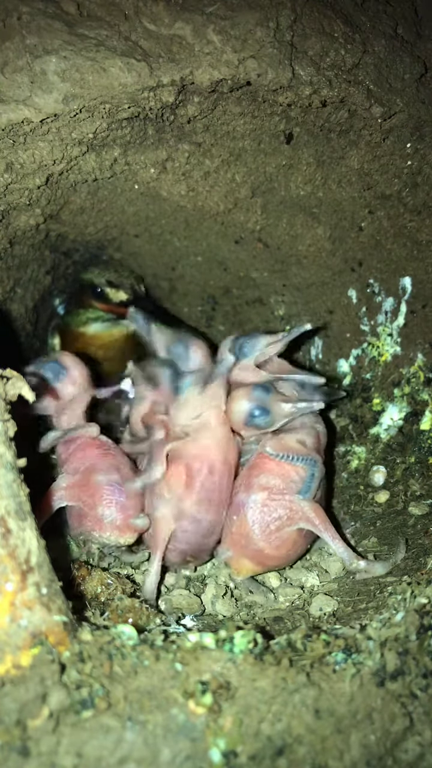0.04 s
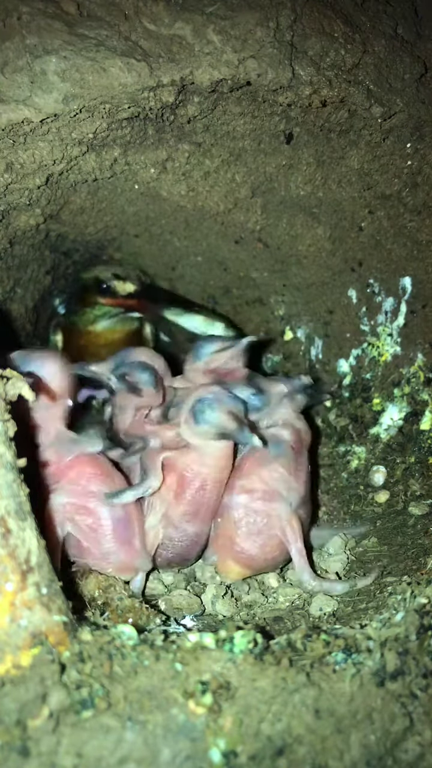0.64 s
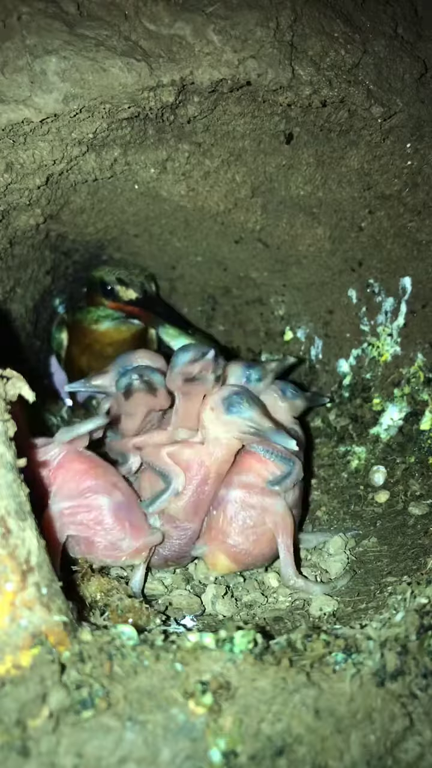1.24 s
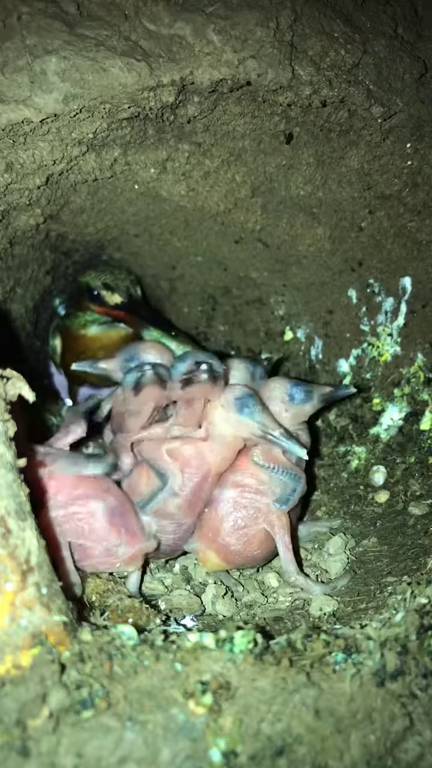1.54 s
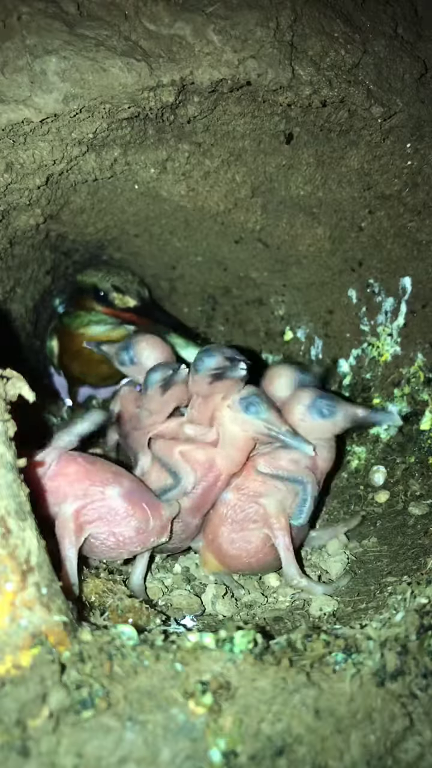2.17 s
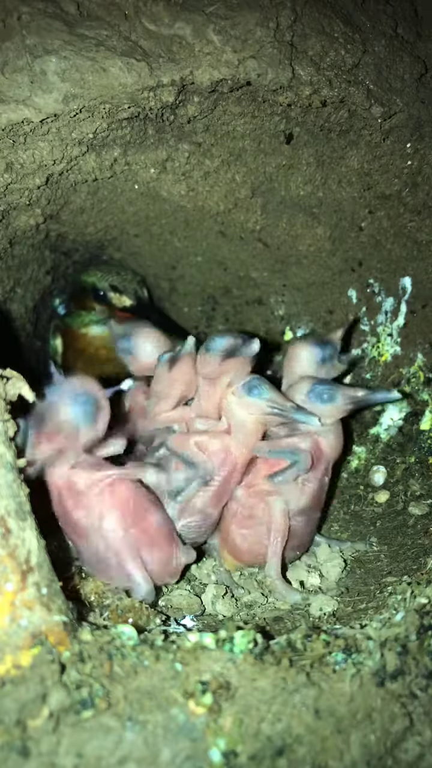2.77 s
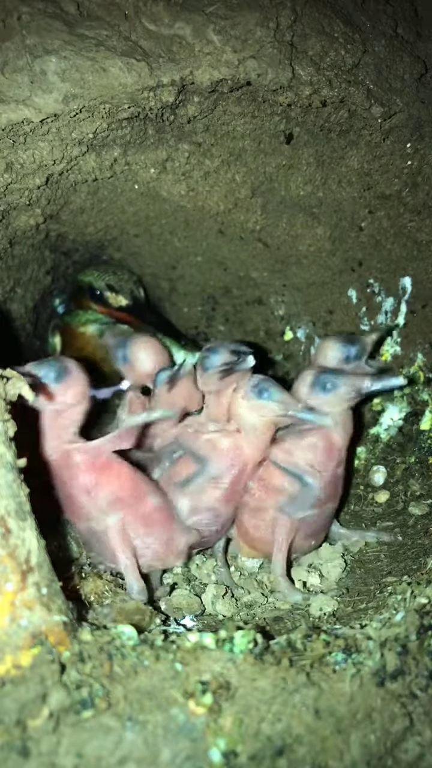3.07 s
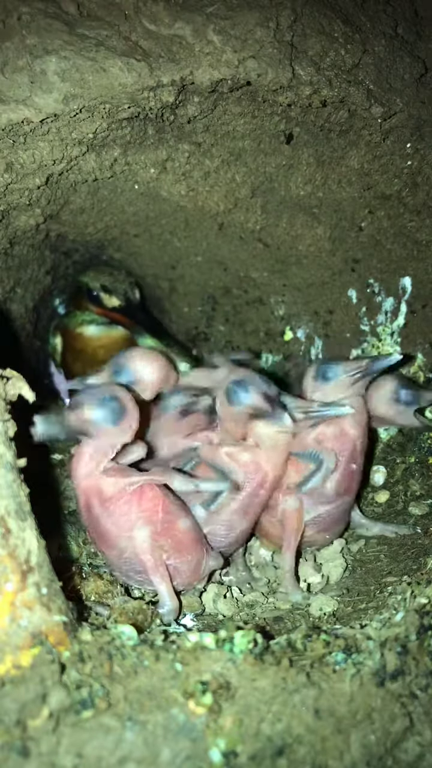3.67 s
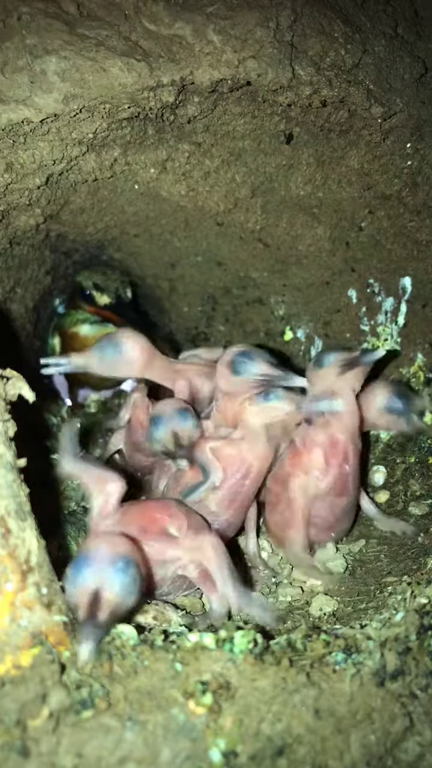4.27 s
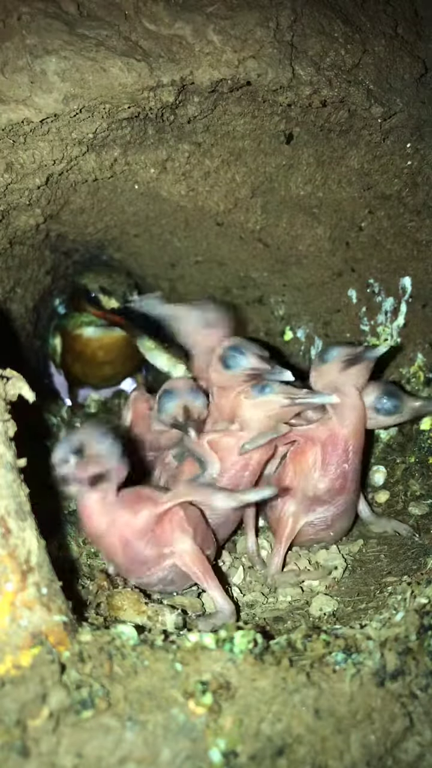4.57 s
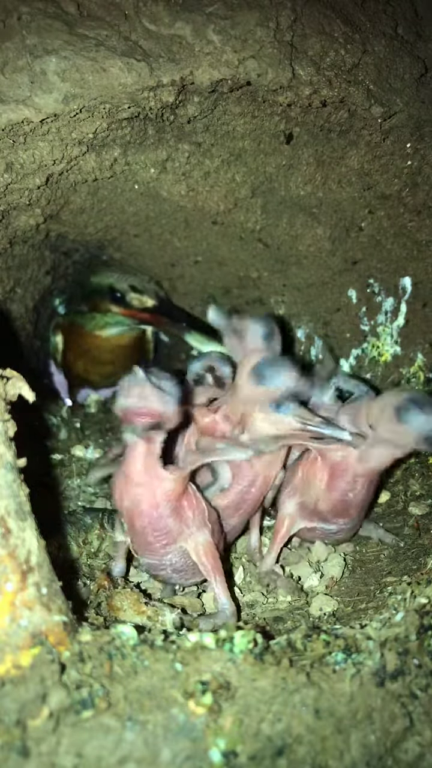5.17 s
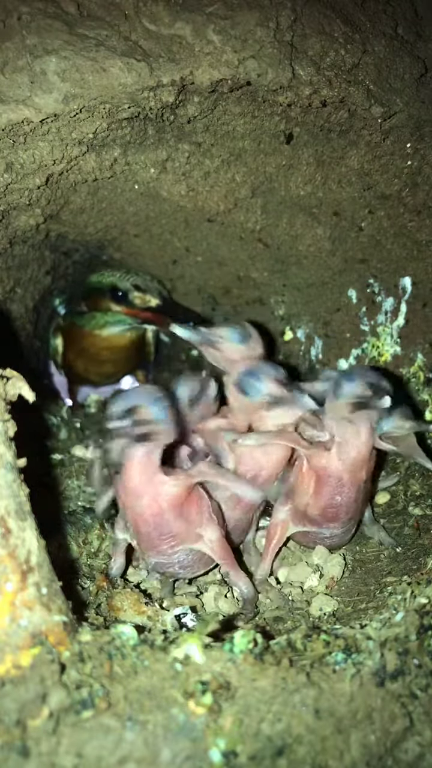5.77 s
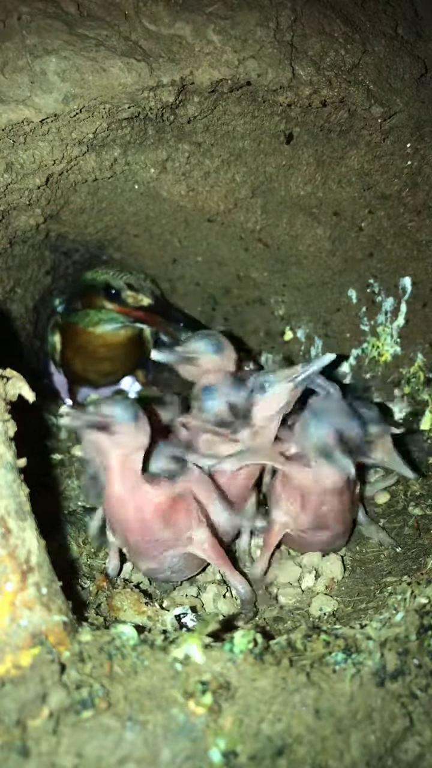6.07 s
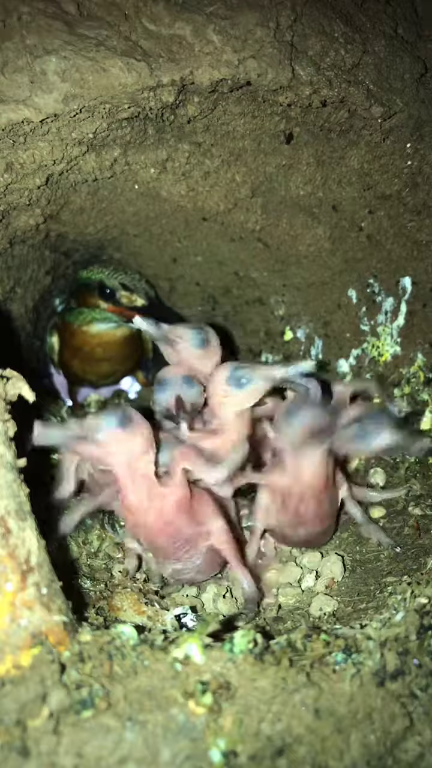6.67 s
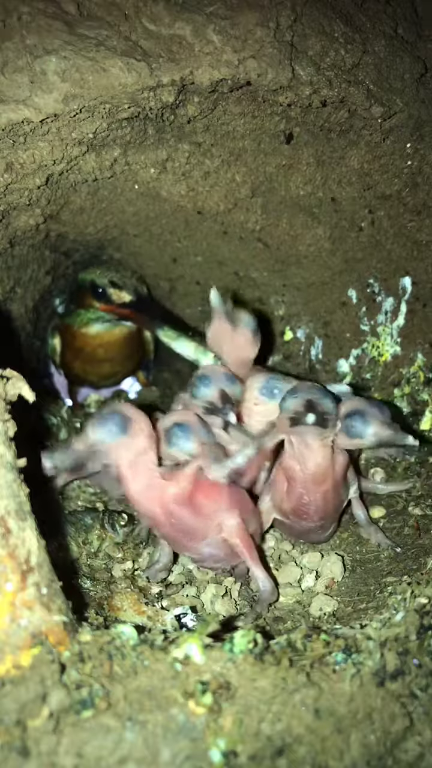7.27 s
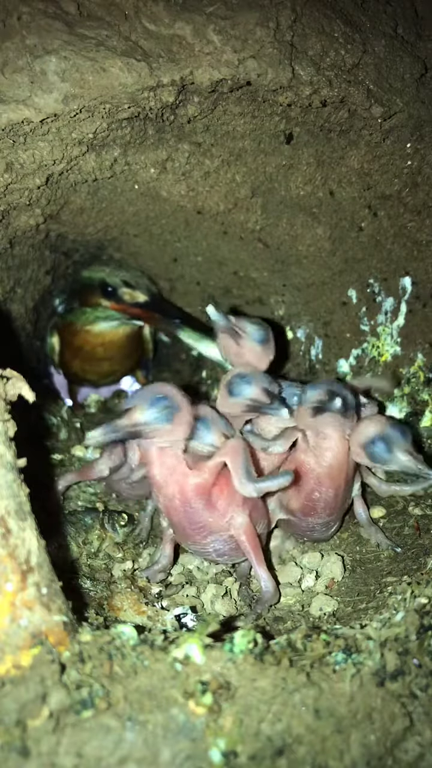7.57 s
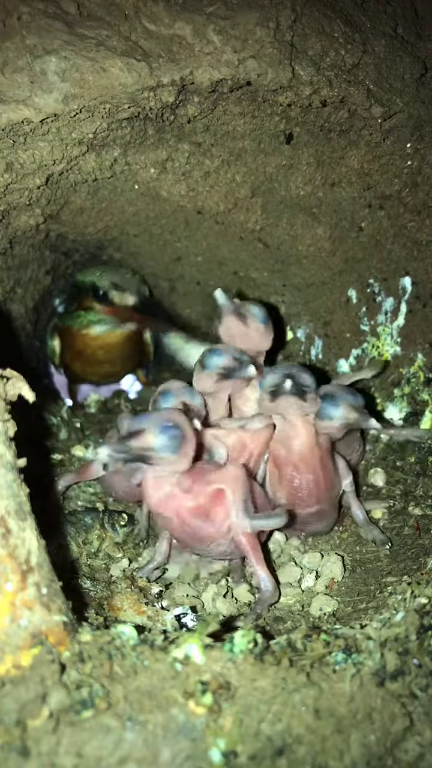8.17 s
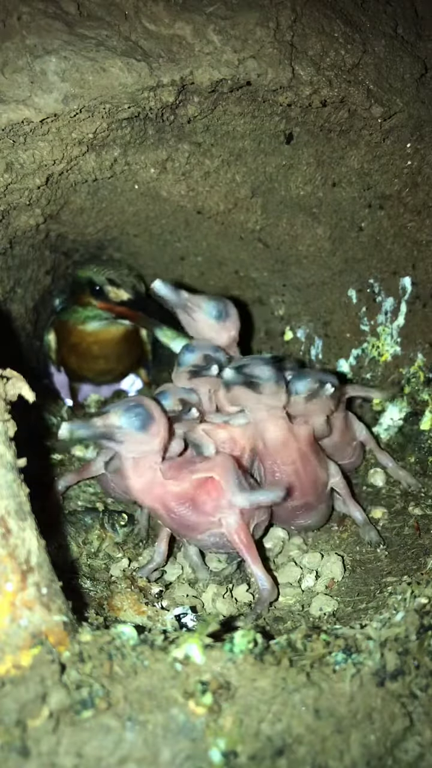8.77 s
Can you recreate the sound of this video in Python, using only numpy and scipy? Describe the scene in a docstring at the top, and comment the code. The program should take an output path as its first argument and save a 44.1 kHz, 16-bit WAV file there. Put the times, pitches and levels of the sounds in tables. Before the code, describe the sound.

Baby birds beg in a dense, high-pitched chorus of raspy cries and thin whistles over a steady low hum.

```python
"""Nestlings begging in an earth burrow

Each call arches in pitch with the push of air through the syrinx: clear at both ends, hoarse at the
top, where the membranes vibrate chaotically. Thin whistles slide between the calls, and the rest of
the brood rasps and calls softly in bouts. Resonances of bills and chamber colour every voice;
a low hum and a faint hiss lie underneath."""
import sys
import numpy as np
from scipy import signal
from scipy.fft import rfft, irfft, next_fast_len
from scipy.io import wavfile
from scipy.ndimage import map_coordinates

SR = 44100
rng = np.random.default_rng(int(sys.argv[2]) if len(sys.argv) > 2 else 0)


def store_pcm(level_fs):
    """Save levels as 16-bit WAV."""
    pcm = np.round(np.clip(level_fs, -1, 1) * 32767).astype(np.int16)
    wavfile.write(sys.argv[1], SR, np.atleast_2d(pcm).T)


N = 398223

# loud calls: t/s, duration/s, nominal top f/Hz, final f/Hz, base level/dB, manner
BEGGING_CALLS = [(0, .038, 6573, 3760, -28, "rasp"), (0.208, 0.099, 7480, 6600, -33, "cry"),
                 (0.26, 0.13, 8040, 4070, -22.5, "wail"), (0.497, 0.092, 7080, 3595, -34, "rasp"),
                 (0.628, 0.083, 9400, 3897, -22.5, "scream"), (0.803, 0.091, 8400, 4060, -25, "scream"),
                 (0.897, 0.12, 7250, 4020, -28.5, "rasp"), (0.982, 0.097, 8860, 7300, -25.5, "squeal"),
                 (1.126, 0.051, 6430, 4500, -31.5, "cry"), (1.242, 0.1, 7450, 3700, -29.5, "rasp"),
                 (1.375, 0.1495, 7170, 5550, -32.5, "rasp"), (1.515, .13, 7210, 4060, -23, "cry"),
                 (1.64, 0.11, 6430, 4200, -26.5, "cry"), (1.807, 0.11, 7800, 5900, -28.5, "rasp"),
                 (1.922, 0.15, 7340, 5000, -24.5, "cry"), (2.097, 0.077, 6170, 4270, -28, "cry"),
                 (2.232, 0.12, 7930, 3380, -21, "wail"), (2.42, 0.11, 7920, 4200, -29.5, "rasp"),
                 (2.484, 0.13, 7680, 5960, -27.5, "wail"), (2.558, 0.099, 8100, 3780, -24.5, "scream"),
                 (2.658, 0.13, 6930, 5900, -27.5, "rasp"), (2.742, 0.17, 7820, 6100, -25, "wail"),
                 (2.905, 0.057, 7930, 4770, -21, "scream"), (3.093, 0.14, 7420, 6560, -21.5, "scream"),
                 (3.242, 0.086, 6950, 3490, -25.5, "scream"), (3.39, 0.19, 7770, 5080, -27, "scream"),
                 (3.509, 0.15, 6960, 5760, -33, "rasp"), (3.658, 0.1, 7690, 3920, -21.5, "scream"),
                 (3.769, .147, 6770, 4430, -32.5, "rasp"), (3.894, 0.064, 7030, 6400, -32.5, "squeal"),
                 (4.003, 0.078, 6830, 3970, -32, "squeal"), (4.078, 0.07, 7870, 3370, -19, "cry"),
                 (4.182, 0.12, 6830, 3860, -29, "squeal"), (4.391, 0.084, 7040, 3870, -30.5, "squeal"),
                 (4.54, 0.049, 8000, 6925, -27.5, "cry"), (4.586, .116, 6870, 4500, -26, "rasp"),
                 (4.717, 0.0981, 7700, 3400, -25, "scream"), (4.852, 0.13, 7550, 7200, -30.5, "cry"),
                 (4.911, 0.07, 6880, 6030, -25.5, "rasp"), (4.944, .12, 7610, 6650, -21.5, "wail"),
                 (5.082, 0.095, 7048, 4780, -22.5, "wail"), (5.236, 0.15, 6440, 4170, -37.5, "squeal"),
                 (5.39, 0.1, 8460, 3690, -18, "scream"), (5.542, 0.053, 6870, 6820, -31, "cry"),
                 (5.623, 0.054, 7030, 6160, -28.5, "squeal"), (5.665, 0.11, 7670, 5730, -21.5, "wail"),
                 (5.785, 0.095, 6450, 3900, -25, "squeal"), (5.838, .129, 7250, 5350, -30, "rasp"),
                 (5.955, 0.15, 6700, 5080, -30.5, "squeal"), (6.162, .102, 7290, 4050, -21.5, "scream"),
                 (6.328, 0.12, 6787, 5160, -29.5, "rasp"), (6.428, 0.086, 7130, 3560, -24.5, "rasp"),
                 (6.483, 0.074, 7850, 3720, -25.5, "scream"), (6.674, 0.12, 7720, 4650, -20, "cry"),
                 (6.834, 0.11, 6740, 3740, -24, "cry"), (6.998, 0.097, 7880, 3500, -19.5, "cry"),
                 (7.146, 0.11, 6900, 4800, -29.5, "cry"), (7.246, .118, 7470, 6400, -24, "cry"),
                 (7.377, 0.088, 7800, 4330, -32, "cry"), (7.495, .11, 7320, 4360, -26, "rasp"),
                 (7.676, 0.13, 7700, 6100, -26.5, "rasp"), (7.775, 0.12, 7230, 5260, -23, "cry"),
                 (7.911, 0.13, 6800, 3720, -27.5, "rasp"), (8.129, 0.11, 7700, 5850, -23.5, "cry"),
                 (8.215, 0.14, 7280, 5730, -28.5, "rasp"), (8.428, 0.096, 7380, 5930, -21.5, "cry"),
                 (8.599, 0.19, 6954, 5400, -26, "rasp"), (8.798, 0.1, 7500, 3530, -20.5, "cry")]
# five manners of calling, as offsets to the base level: manner -> voice/dB, rasp/dB, screech/dB
MANNER_LEVELS = {"cry": (-2.5, -6, -33), "rasp": (-5.5, -3, -13.5), "wail": (-3, -7, -5),
                 "scream": (-4.5, -8, -1.5), "squeal": (-2.5, -15.5, 0)}
# clearest whistles: t/s, duration/s, middle f/Hz, base level/dB, bend
CLEAR_WHISTLES = [(0.06, 0.036, 4540, -34.5, "fall"), (0.468, 0.061, 5330, -31, "fall"),
                  (1.068, 0.046, 4738, -35, "fall"), (2.067, 0.03, 4660, -26.5, "scoop"),
                  (2.309, 0.13, 5840, -33.5, "fall"), (2.816, 0.054, 6236, -31, "fall"),
                  (3.305, 0.051, 5900, -33, "scoop"), (4.138, .129, 6090, -31, "fall"),
                  (4.112, 0.1, 4020, -37.5, "fall"), (5.0, 0.094, 5300, -34, "level"),
                  (5.106, 0.049, 5160, -29, "fall"), (5.165, .091, 5320, -27.5, "level"),
                  (5.895, 0.09, 5210, -31.5, "scoop"), (5.998, 0.059, 5100, -32, "fall"),
                  (6.355, 0.12, 4940, -33, "scoop"), (6.574, 0.15, 6150, -31, "fall"),
                  (6.925, 0.1, 3544, -43, "scoop"), (7.323, 0.14, 4980, -32, "fall"),
                  (7.607, .021, 5660, -30.5, "fall"), (7.8, 0.11, 5460, -35.5, "fall"),
                  (8.038, 0.085, 5990, -32, "fall"), (8.25, .2, 4430, -34.5, "fall"),
                  (8.338, .072, 5850, -30, "fall"), (8.547, 0.0506, 4520, -37, "scoop")]
# pitch contours of a whistle: bend -> first and last frequency as ratios to the middle one
WHISTLE_BENDS = {"fall": (1.03, .86), "scoop": (1.1, 1.07), "level": (1, 1.02)}
# bouts in which the rest of the brood joins in: start t/s, end t/s
BOUTS = [(0, .09), (.23, 1.21), (1.25, 1.735), (1.82, 3), (3.1, 4.505), (4.56, 4.8), (4.86, 6.93),
         (7.005, 7.6), (7.68, 8.09), (8.135, 8.89)]
# spectrum of a hoarse throat at moderate effort: f/Hz, relative level/dB
RASP_SPECTRUM = [(700, -27), (1300, -17.5), (1650, -14), (2300, -14), (2650, -10.5), (3200, -16),
                 (3750, -4), (4400, -6.5), (5400, 0), (7200, 0.5), (8300, -2), (10800, -16.5), (12700, -10),
                 (15800, -14)]
# spectrum of a wide-open bill at full effort: f/Hz, relative level/dB
SCREECH_SPECTRUM = [(600, -31), (1800, -8.5), (2600, 0.5), (3800, -20), (7000, 3), (9300, 11.5),
                    (10800, 6.5), (12500, 9), (15800, 1.5)]
# peaks and one dip in the response of bills and chamber, then a treble cut: f/Hz, width/Hz, gain/dB
CHAMBER_BANDS = [(1880, 249, 3.5), (3570, 710, 4), (4500, 270, 0.5), (5470, 80, 4.5), (6880, 430, 1.5),
                 (8700, 132, -1.5), (15200, 1700, -6.5)]
# spectrum of the background rumble and hiss: f/Hz, relative level/dB
HUM_SPECTRUM = [(20, -41), (30, -17), (42, -5.5), (62, 0.5), (90, -2.5), (122, -0.5), (165, -3), (190, -14),
                (250, -23), (480, -30.5), (1200, -36.5), (4000, -40.5), (10000, -41.5), (15500, -32)]


def begging():
    """Superposition: the calls of the nearest chicks overlap and add."""
    out = np.zeros(N)
    for start, length, top_hz, last_hz, db, manner in BEGGING_CALLS:
        add(out, start, call(length, top_hz, last_hz, db, manner))
    return out


def call(length, top_hz, last_hz, db, manner, rise_s=.0125, fall_s=.019, jitter_hz=420, waver_hz=220,
         twin_ratio=.79, bill_hz=12600, skirt_hz=330, squeal_hz=380):
    """Nonlinear oscillation: pitch follows the push of air, and a hard push makes membranes chaotic."""
    voice_db, rasp_db, screech_db = db + np.array(MANNER_LEVELS[manner])
    u = progress(0, length)
    size, since, left = len(u), u * length, (1 - u) * length
    fall_stretch, chirp_gain = amp(2.5 * rng.standard_normal(2))
    attack = np.exp(-since / rise_s)
    release = np.exp(-left / (fall_s * fall_stretch))
    push = np.abs(np.sin(np.pi * u ** 0.74))  # peaks early in the call
    arch = top_hz * (1 - .22 * attack) + (last_hz - top_hz) * release

    def chaos():
        """Random frequency modulation in Hz, growing with the push."""
        deviation = jitter_hz * wobble(2600, size) + waver_hz * wobble(160.5, size)
        return push * (1 - release) ** 2 * deviation

    shimmer = lambda: flutter(depth_db=5.5, rate=550, size=size)
    level = amp(voice_db + 1) * (0.61 + 0.69 * push ** 2) * (1 - 0.13 * attack) * (1 - .5 * release)
    # a call that dives deep ends in a clear chirp
    dive = np.clip((top_hz - last_hz) / 3000, 0, 1)
    chirp = amp(-20 + 0.32 * db) * chirp_gain * dive * np.sin(np.pi * release ** 1.7)
    voice = np.hypot(level, chirp) * shimmer() * syrinx(arch + chaos(), second_db=-21, third_db=-8)
    # the other side of the syrinx joins in, lower, at full push
    twin = level * amp(-7) * push * shimmer() * tone(twin_ratio * arch + chaos())
    rasp = amp(rasp_db - 1) * (0.44 + 0.67 * push) * (1 - attack ** 2) * (1 - 0.38 * release)
    rasp *= rough_air(size, RASP_SPECTRUM, flutter_hz=693, flutter_db=2.5, ripple_db=3.5, ripple_hz=406.4)
    # the bill gapes with the push and lets out the octave and a bright screech
    gape = amp(screech_db) * push ** 1.1
    bill_gain = amp(-1 - np.abs(2 * arch - bill_hz) / skirt_hz)
    octave = bill_gain * shimmer() * tone(2 * arch + chaos() + squeal_hz * wobble(2200, size))
    screech = amp(-4) * rough_air(size, SCREECH_SPECTRUM, flutter_hz=906, flutter_db=3)
    strain = amp(1.8 * push * wobble(70, size))  # the push itself is unsteady
    gate = np.clip(np.minimum(since, left) / 0.00067, 0, 1)
    return gate * strain * (voice + twin + rasp + gape * (octave + screech))


def syrinx(pitch, second_db, third_db, bill_hz=12500, skirt_hz=230):
    """Resonance: two weak harmonics of a nearly pure tone emerge as they glide through the bill's peak."""
    overtone = lambda hz, db: amp(db - np.abs(hz - bill_hz) / skirt_hz) * tone(hz)
    return tone(pitch) + overtone(2 * pitch, second_db) + overtone(3 * pitch, third_db)


def rough_air(size, spectrum, flutter_hz, flutter_db, ripple_db=0, ripple_hz=830):
    """Source and filter: flapping membranes chop air into puffs, which throat resonances colour."""
    puffs = rng.standard_normal(size) * flutter(flutter_db, flutter_hz, size)
    fft_size = next_fast_len(size + 256)
    f = np.fft.rfftfreq(fft_size, 1 / SR)
    ripple = map_coordinates(rng.standard_normal(128), [f / ripple_hz], mode="mirror")  # each throat's own
    colour_db = spectrum_db(spectrum, f) + ripple_db * ripple
    return unit(irfft(rfft(puffs, fft_size) * amp(colour_db), fft_size)[:size])


def whistles():
    """Superposition: the clearest whistles add up to thin glides among the calls."""
    out = np.zeros(N)
    for start, length, middle_hz, db, bend in CLEAR_WHISTLES:
        add(out, start, whistle(length, middle_hz, db, bend))
    return out


def whistle(length, middle_hz, db, bend, waver_hz=55, drift_hz=70, shimmer_db=3.5):
    """Nearly periodic oscillation: a gentle call stays tonal and quavers along a parabolic bend."""
    u = progress(0, length)
    first, last = WHISTLE_BENDS[bend]
    glide = middle_hz * np.polyval(np.polyfit([0, .5, 1], [first, 1, last], 2), u)
    pitch = glide + waver_hz * wobble(403, len(u)) + drift_hz * wobble(24.8, len(u))
    level = amp(db + 1.5 + shimmer_db * wobble(133.8, len(u))) * fade(u, edge=0.13)
    return level * syrinx(pitch, second_db=-18, third_db=-21)


def soft_calls(length=.105, top_hz=6900, last_hz=4700, spread=.16, base_db=-34, scatter_db=4):
    """Attenuation with distance: chicks further back fill the bouts with weaker calls."""
    out = np.zeros(N)
    for start, top, last, strength in turns(per_second=6, length=length):
        db = base_db + scatter_db * strength
        add(out, start, call(length, top_hz * (1 + spread * top), last_hz * (1 + spread * last), db, "cry"))
    return out


def soft_whistles(length=.075, middle_hz=5400, spread=0.19, stretch=0.48, base_db=-38.5, scatter_db=2):
    """Frequency glides: faint falling whistles from further back thread through the bouts."""
    out = np.zeros(N)
    for start, pitch, span, strength in turns(per_second=3, length=length):
        db = base_db + scatter_db * strength
        add(out, start, whistle(length * (1 + stretch * span), middle_hz * (1 + spread * pitch), db, "fall"))
    return out


def brood(level_db=-37, surge_db=3, fade_s=0.0058):
    """Amplitude-modulated noise: the rest of the heap rasps in bouts, with short hushes between."""
    out = np.zeros(N)
    for start, end in BOUTS:
        u = progress(start, end)
        effort = amp(level_db + surge_db * wobble(17.55, len(u))) * fade(u, edge=fade_s / (end - start))
        air = rough_air(len(u), RASP_SPECTRUM, flutter_hz=601.9, flutter_db=4.5,
                        ripple_db=0.5, ripple_hz=462)
        add(out, start, effort * air)
    return out


def burrow(x, t60=0.024, wet_db=-9):
    """Reverberation in a small cavity: close earth walls give a very short tail and a few resonances."""
    t = np.arange(SR // 20) / SR
    tail = rng.standard_normal(len(t)) * 1000 ** (-t / t60) * (t > .0007)
    reflections = amp(wet_db) * signal.fftconvolve(x, tail / np.linalg.norm(tail))[:N]
    response = lambda f: amp(sum(db * np.exp(-((f - hz) / width) ** 2) for hz, width, db in CHAMBER_BANDS))
    return filtered(x + reflections, response)


def background(level_db=-33, line_hz=121, line_db=-47):
    """A continuous spectrum and one line: steady rumble and faint hiss with a weak wavering tone."""
    rumble = unit(filtered(rng.standard_normal(N), lambda f: amp(spectrum_db(HUM_SPECTRUM, f))))
    return amp(level_db) * rumble + amp(line_db) * tone(line_hz + 3 * wobble(6, N))


def turns(per_second, length):
    """Jittered spacing within the bouts: yields t/s and three random traits from -1 to 1."""
    for start, end in BOUTS:
        count = round((end - start) * per_second)
        window = max(end - start - length, 0)
        for turn, (delay, *traits) in enumerate(rng.uniform(-1, 1, (count, 4))):
            yield start + (turn + .5 + .5 * delay) / count * window, *traits


def tone(pitch):
    """Phase is the integral of frequency: a sine of rms 1, muted above the Nyquist limit."""
    phase = 2 * np.pi * np.cumsum(pitch) / SR + rng.uniform(0, 2 * np.pi)
    return np.sqrt(2) * np.sin(phase) * (pitch < SR / 2)


def flutter(depth_db, rate, size):
    """Saturation: a fast random gain of rms 1, bounded like the swing of a membrane."""
    return unit(amp(depth_db * 2 * np.tanh(wobble(rate, size) / 2)))


def wobble(rate, size):
    """Spline interpolation: a smooth random curve with `rate` knots a second."""
    return map_coordinates(rng.standard_normal(int(size * rate / SR) + 4), [np.arange(size) * rate / SR])


def spectrum_db(spectrum, f):
    """Level at f, interpolated along a logarithmic frequency axis."""
    hz, db = np.transpose(spectrum)
    return np.interp(np.log(f + 1), np.log(hz), db)


def filtered(x, response):
    """Linear filtering: the spectrum of x times a frequency response."""
    fft_size = next_fast_len(N + 8192)
    return irfft(rfft(x, fft_size) * response(np.fft.rfftfreq(fft_size, 1 / SR)), fft_size)[:N]


def progress(start, end):
    """Normalised time, 0 to 1, for each sample of a note."""
    return np.linspace(0, 1, max(round((end - start) * SR), 256))


def fade(u, edge):
    """Quarter-sine taper at both ends of a note."""
    return np.sin(np.pi / 2 * np.clip(np.minimum(u, 1 - u) / edge, 0, 1))


def add(track, start, sound):
    """Superpose a sound on a track from `start` seconds."""
    i = max(round(start * SR), 0)
    track[i:i + len(sound)] += sound[:max(N - i, 0)]


def amp(db):
    """Decibels to amplitude ratio."""
    return 10 ** (np.asarray(db) / 20)


def unit(x):
    """Normalise to rms 1."""
    return x / np.sqrt(np.mean(x ** 2) + 1e-20)


def scene():
    """Superposition: all voices pass through the burrow and add to the hum, in one channel."""
    voices = begging() + whistles() + soft_calls() + soft_whistles() + brood()
    return (burrow(voices) + background())[None]


def record(dry, cutoff_hz=15830):
    """Band limiting: an ideal low-pass filter removes the highest treble."""
    return np.array([filtered(channel, lambda hz: hz < cutoff_hz) for channel in dry])


dry = scene()
out = record(dry)
store_pcm(out)
```